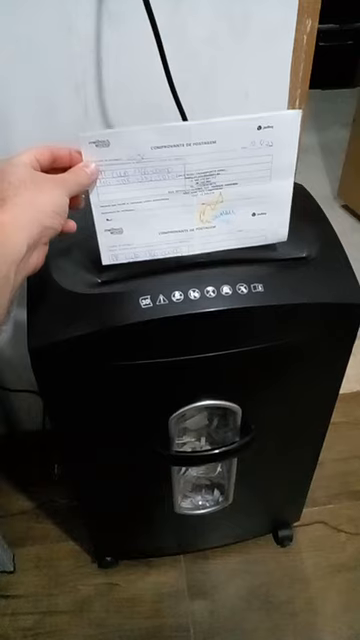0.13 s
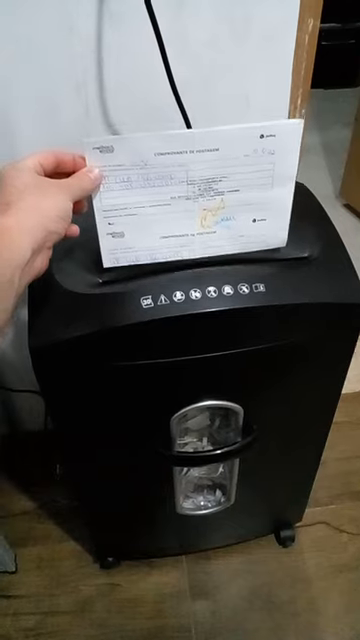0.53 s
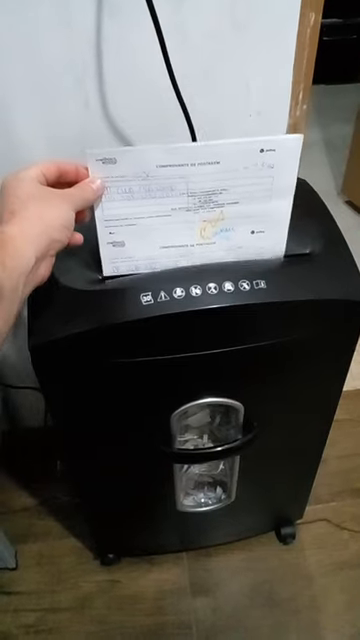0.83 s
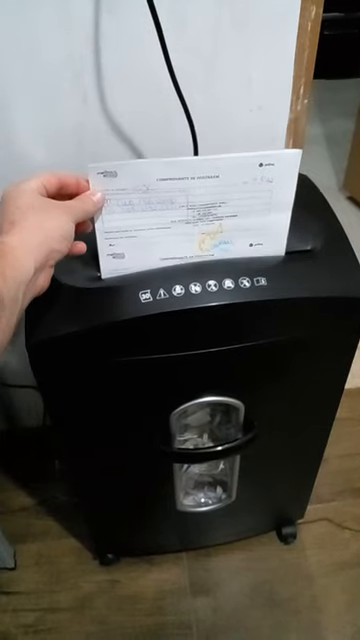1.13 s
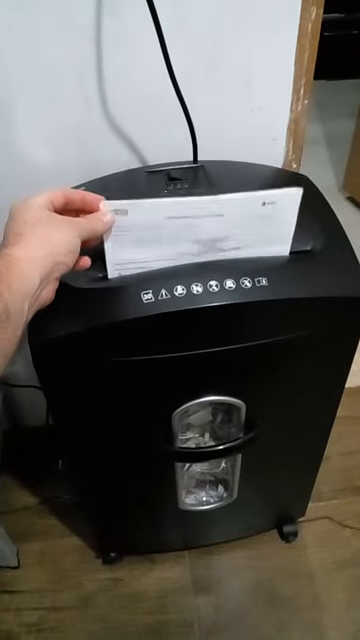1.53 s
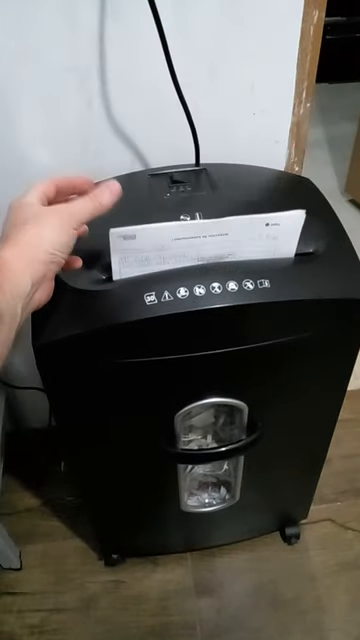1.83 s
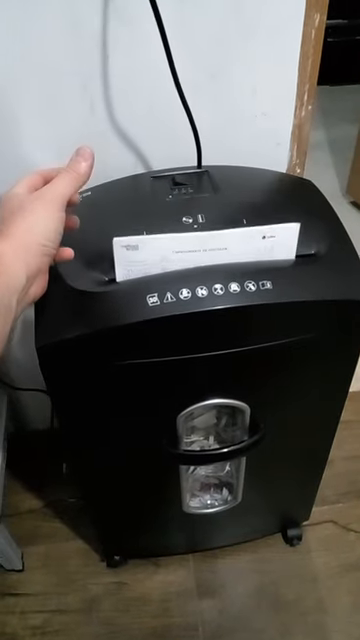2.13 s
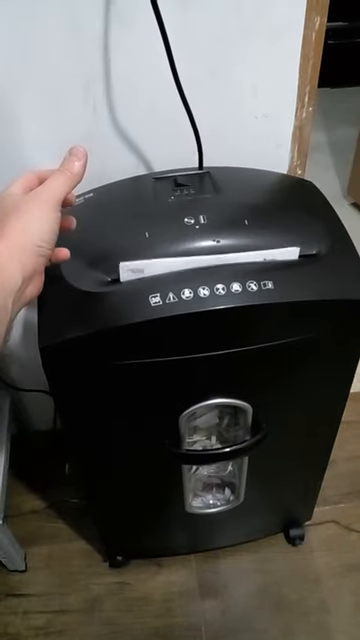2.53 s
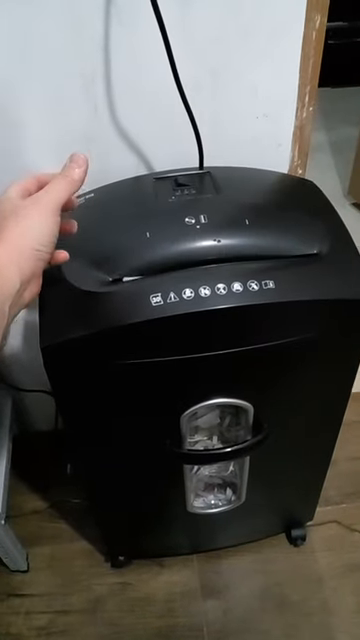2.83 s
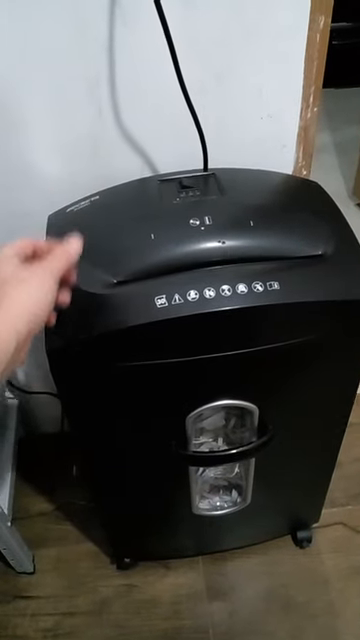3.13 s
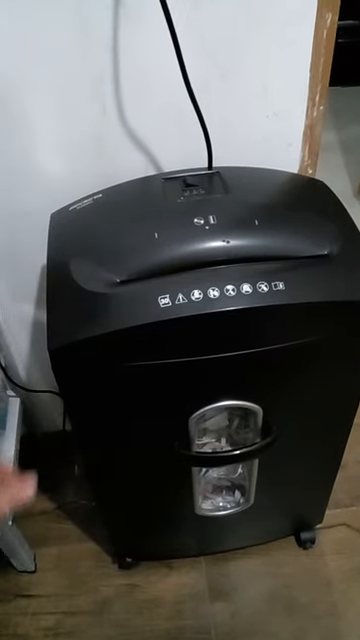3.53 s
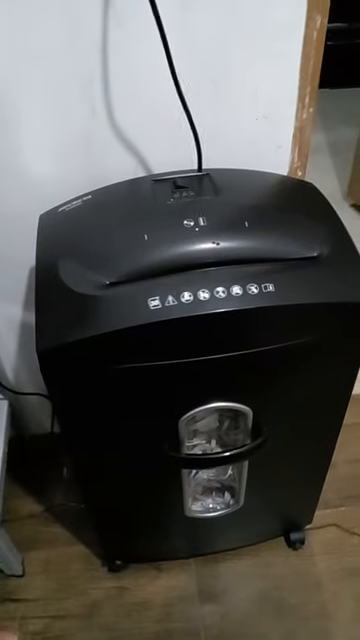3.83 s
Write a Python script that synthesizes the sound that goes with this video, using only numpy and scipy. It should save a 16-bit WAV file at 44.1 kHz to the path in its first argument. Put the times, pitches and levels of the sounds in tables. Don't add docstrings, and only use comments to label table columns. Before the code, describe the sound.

After over a second of near quiet, a paper shredder clicks on, surges to speed and keeps grinding with buzzing casing and gear whine while paper tears crisply; close microphone, short indoor echo.

```python
import sys
import numpy as np
from scipy import signal
from scipy.fft import rfft, irfft, next_fast_len
from scipy.io import wavfile
from scipy.ndimage import uniform_filter1d, map_coordinates

SR = 44100
rng = np.random.default_rng(int(sys.argv[2]) if len(sys.argv) > 2 else 0)


def materialize(psi):
    bounded = np.clip(np.atleast_2d(psi).T, -1, 1)
    quanta = np.round(bounded * 32767).astype(np.int16)
    wavfile.write(sys.argv[1], SR, quanta)


def volts_from_db(level):
    exponent = np.asarray(level, float) / 20
    return 10 ** exponent


N = 176400

# frequency in Hz, level in dB per Hz.
AIR_COLOUR = [(25, -21), (55, -9), (205, -6), (555, -5), (1500, -14), (2300, -20.5), (3200, -33),
              (5000, -40)]
# frequency in Hz, width in Hz, lift in dB.
AIR_RESONANCES = [(125.2, 7.2, 15), (192, 14, -6), (271, 17, 14), (303, 12, 6.5), (336, 14, 7.5),
                  (437, 24, 5.5), (512, 30, 3.5), (664, 18, 6), (4070, 540, 7)]
# frequency in Hz, level in dB.
WALL_COLOUR = [(100, -2), (3000, 1), (8000, -6), (15700, -6)]
# frequency in Hz, level in dB per Hz.
RELAY_COLOUR = [(120, -25), (200, -28), (577, 0), (1050, -1.5), (1340, -10.5), (2870, -7), (9420, -13),
                (15700, -21)]
# centre in seconds, half length in seconds, pitch in Hz, level
# in dB.
RINGING_SWELLS = [
    (1.517, 0.078, 1222, -44),
    (1.505, 0.043, 1392, -47),
    (1.504, 0.052, 590, -38),
    (1.74, 0.067, 452, -30),
    (2.56, 0.16, 327, -38.5),
    (2.48, 0.19, 200, -39),
    (3.1, 0.12, 327, -42),
    (3.45, .15, 180, -42),
    (4.2, 0.15, 1004, -49),
]
# time in seconds, level in dB.
PULL_LEVEL = [
    (1.43, -89),
    (1.47, -33.5),
    (1.53, -22),
    (1.67, -19.5),
    (1.93, -25.5),
    (2.71, -27),
    (2.75, -26),
    (3.97, -26),
    (4.0, -26.5),
]
# time in seconds, level in dB.
LOAD_LEVEL = [
    (1.43, -44.5),
    (1.5, -36.5),
    (1.57, -30),
    (1.7, -29),
    (1.78, -29.5),
    (2.0, -29),
    (3.0, -29.5),
    (4.0, -29),
]
# multiple of the turn rate, level in dB under the load, phase in radians.
WHINE_ORDERS = [(18, -16, 0), (20, -22, 1), (23, -16, 2.15), (24, -11.5, 1.23), (32, -22, .3), (52, -19, 0)]
# share of a turn, level in dB.
PROUD_TEETH = [(.025, -4), (.215, 0), (.322, 0), (.507, 0), (.62, 2.5), (.842, 1)]
# frequency in Hz, level in dB.
THUMP_COLOUR = [(150, -13), (300, -12.5), (480, 1), (700, -2.5), (1200, -18), (4000, -42)]
# frequency in Hz, level in dB.
TOOTH_COLOUR = [(300, -6), (520, -9), (800, 0), (1400, -1), (2200, 5.5), (2700, 3), (3100, 8), (9000, -5)]
# frequency in Hz, level in dB per Hz.
BODY_COLOUR = [(25, -45.5), (110, -17.5), (170, -12.5), (260, -6.5), (480, -7), (935, -20.5), (2950, -32),
               (8000, -46.5), (15700, -63.5)]
# frequency in Hz, width in Hz, lift in dB.
CASING_RESONANCES = [(67, 10, 9), (184, 10, 10), (204, 10, 7), (218, 14, -3), (260, 10, -3), (458, 36, 6),
                     (500, 44, 3.5), (533, 14, 5), (553, 14, -7), (578, 20, 4), (655, 16, 6), (700, 25, -5),
                     (737, 16, 5), (778, 16, 5), (850, 70, 4)]
# frequency in Hz, width in Hz, lift in dB.
SHAFT_RESONANCES = [(1004, 25, 6), (1145, 18, 5), (1222, 32, 8), (1341, 26, 10), (1392, 24, 9),
                    (1470, 60, -2), (2125, 30, 4), (2213, 27, 4), (2330, 160, 5), (2520, 150, -2),
                    (2720, 80, 4), (2970, 340, 7), (3520, 120, 3), (5890, 300, 6)]
# time in seconds, level in dB.
CUT_LEVEL = [(1.5, -54), (1.57, -63), (1.71, -52), (2.27, -48.5), (2.7, -50), (2.82, -48.5), (3.02, -52),
             (3.51, -52), (3.67, -57), (3.8, -53), (3.9, -61), (4.0, -63)]
# frequency in Hz, level in dB per Hz.
TEAR_COLOUR = [(1500, -23), (3500, 10), (6000, 6.5), (7500, -0.5), (10500, 1), (13000, 2.5), (15700, -1.5)]
# time in seconds, peak in dB.
FOLD_TICKS = [(1.5101, -38), (1.715, -35), (1.797, -37), (1.9456, -38), (2.019, -33), (2.104, -36),
              (2.16, -37), (2.204, -31), (2.2782, -34), (2.322, -32), (2.3417, -37), (2.5293, -36),
              (2.5586, -44), (2.615, -31.5), (2.7766, -35), (2.8105, -33.5), (2.9454, -36), (3.1074, -38),
              (3.2871, -37), (3.746, -43), (3.7894, -41), (3.8222, -38)]
# frequency in Hz, level in dB per Hz.
FOLD_COLOUR = [(1500, -18), (3500, 10.5), (6000, 3.5), (9000, 4), (12000, -3), (15700, -11)]
# time in seconds, peak in dB, pitch in Hz.
SHEET_SNAPS = [(1.512, -34, 3200), (1.5347, -40, 2580), (1.594, -31, 2680), (1.6225, -38, 2740),
               (1.6832, -29.5, 2760), (1.7761, -43, 2840), (1.7966, -35, 2740), (2.078, -33, 2800),
               (2.264, -29, 2940), (2.3174, -33, 2740), (2.5798, -38, 2700), (2.6157, -48, 2880),
               (2.6367, -40, 2880), (2.697, -39, 2860), (2.713, -34, 2770), (2.7499, -37, 2900),
               (2.8078, -46, 3160), (2.8392, -32.5, 2950), (2.861, -33, 3000), (2.9095, -39, 2720),
               (2.945, -35, 3150), (3.0248, -43, 2950), (3.146, -46, 2920), (3.167, -38, 2700),
               (3.2666, -44, 2900), (3.4468, -35, 2790), (3.4922, -39, 2640), (3.6109, -38, 2730),
               (3.639, -31, 2680), (3.7476, -35, 2720), (3.785, -36, 2710), (3.825, -34, 2760),
               (3.9676, -48, 2800)]
# frequency in Hz, level in dB.
SNAP_COLOUR = [(1200, 5), (2500, 9.5), (6000, 9), (9000, -29), (15000, -20)]

START_S = 1.4278
TURN_HZ = 10.242


def unit(x):
    return x / np.sqrt(np.mean(x ** 2) + 1e-20)


def clock():
    return np.arange(N) / SR


def running():
    return clock() > START_S


def noise():
    return rng.standard_normal(N)


def curve(rows):
    return np.interp(clock(), *np.transpose(rows))


def wobble(rate):
    knots = rng.standard_normal(int(N * rate / SR) + 4)
    return map_coordinates(knots, [clock() * rate])


def fade(start, t60):
    t = clock() - start
    return (t >= 0) * volts_from_db(-60 * np.abs(t) / t60)


def coloured(x, points, bumps=()):
    m = 2 * next_fast_len(N // 2 + 8192)
    hz = np.fft.rfftfreq(m, 1 / SR)
    f, level = np.transpose(points)
    db = np.interp(np.log(hz + 1), np.log(f + 1), level)
    for centre, width, lift in bumps:
        db = db + lift / (1 + (2 * (hz - centre) / width) ** 2)
    cepstrum = irfft(np.log(volts_from_db(db)), m)
    fold = np.r_[1, 2 * np.ones(m // 2 - 1), 1, np.zeros(m // 2 - 1)]
    response = np.exp(rfft(cepstrum * fold))
    return irfft(rfft(x, m) * response, m)[:N]


def patchy(x, depth_db):
    z = signal.stft(x, nperseg=256)[2]
    across = uniform_filter1d(rng.standard_normal(z.shape), 10, 0)
    field = uniform_filter1d(across, 30, 1)
    return signal.istft(z * volts_from_db(depth_db * unit(field)), nperseg=256)[1][:N]


def air():
    level_db = -64.5 + 3 * np.minimum(clock(), START_S) + .4 * wobble(8.4)
    rumble = unit(patchy(coloured(noise(), AIR_COLOUR, AIR_RESONANCES), 1.1))
    return volts_from_db(level_db) * rumble + volts_from_db(-85) * noise()


def room(x):
    t = np.arange(SR // 2) / SR
    t60 = 0.87
    tail = rng.standard_normal(len(t)) * volts_from_db(-60 * t / t60) * (t > .004)
    return coloured(signal.fftconvolve(x, tail / np.linalg.norm(tail))[:N], WALL_COLOUR)


def relay():
    burst = unit(coloured(noise(), RELAY_COLOUR))
    snap = volts_from_db(-36) * fade(START_S, .04)
    rattle = volts_from_db(-39.5 + 1.2 * wobble(90)) * fade(START_S, .39)
    return burst * (snap + rattle)


def buzzes():
    t = clock()
    out = np.zeros(N)
    for centre, half, hz, db in RINGING_SWELLS:
        swell = volts_from_db(db + 4 * wobble(50)) * np.exp(-((t - centre) / half) ** 2)
        out += swell * np.cos(2 * np.pi * hz * t + .0012 * hz * wobble(60))
    return out * running()


def hum():
    phase = 2 * np.pi * 120.03 * (clock() - 3)
    pull = volts_from_db(curve(PULL_LEVEL) + .4 * wobble(12)) * np.cos(phase + .6)
    octave = volts_from_db(curve(LOAD_LEVEL) - 8 + wobble(6.5)) * np.cos(2 * phase - 1.05)
    return np.sqrt(2) * (pull + octave) * running()


def wheel():
    spin_up_s, fast_hz, sag_hz_per_s = .05, .005, .022
    t = np.clip(clock() - START_S, 0, None)
    late = clock() - 3
    speed = (1 - np.exp(-t / spin_up_s)) * (1 + 1.5e-4 * wobble(9))
    steady = TURN_HZ * (START_S + spin_up_s + np.cumsum(speed) / SR)
    return fast_hz * late - sag_hz_per_s / 2 * late ** 2 + steady


def whine(turns):
    angle = 2 * np.pi * (turns - 3 * TURN_HZ)
    tones = np.zeros(N)
    for order, db, phase in WHINE_ORDERS:
        tones += volts_from_db(db + 2 * wobble(4)) * np.cos(order * angle + phase)
    return np.sqrt(2) * volts_from_db(curve(LOAD_LEVEL)) * tones * running()


def blows(turns, share, db, slack_s):
    at = np.flatnonzero(np.diff(np.floor(turns - share)))
    luck = rng.standard_normal((400, 2))[:len(at)]
    late = np.round(slack_s * SR * luck[:, 0]).astype(int)
    out = np.zeros(N)
    out[np.clip(at + late, 0, N - 1)] = volts_from_db(db + 1.5 * luck[:, 1])
    return out


def gears(turns):
    thumps = unit(sum(blows(turns, share, db, .00015) for share, db in PROUD_TEETH))
    thumps = coloured(thumps, THUMP_COLOUR)

    oval = np.cos(2 * np.pi * turns - 2.37)
    clicks = unit(blows(8 * turns, 0, 0, .000025))
    knocks = coloured(volts_from_db(-13 + 2 * oval) * clicks, TOOTH_COLOUR)

    flank = rng.standard_normal(round(SR / TURN_HZ))
    flaws = flank[(turns % 1 * len(flank)).astype(int)]
    grind = volts_from_db(0.38 * wobble(25.05)) * noise()
    tight_db = -1.1 * np.cos(6 * np.pi * turns + 0.22) + 0.65 * oval
    rub = volts_from_db(tight_db) * (volts_from_db(-10) * flaws + grind)

    drive = volts_from_db(-4) * thumps + knocks + rub
    ringing = unit(coloured(drive, BODY_COLOUR, CASING_RESONANCES + SHAFT_RESONANCES))
    return volts_from_db(curve(LOAD_LEVEL) + 0.93) * ringing * running()


def tearing():
    fibres_per_s, fibre_share = 800, .2
    hit = rng.random(N) < fibres_per_s / SR * volts_from_db(3 * wobble(40))
    strength = volts_from_db(3.5 * np.minimum(rng.exponential(size=N), 2))
    fibres = unit(hit * noise() * strength)
    hiss = volts_from_db(0.54 * wobble(17)) * noise()
    mix = np.sqrt(fibre_share) * fibres + np.sqrt(1 - fibre_share) * hiss
    return volts_from_db(curve(CUT_LEVEL) + 2) * unit(patchy(coloured(mix, TEAR_COLOUR), 1.5)) * running()


def folds():
    level = sum(volts_from_db(db - 5.5) * fade(start, .016) for start, db in FOLD_TICKS)
    return level * unit(coloured(noise(), FOLD_COLOUR))


def snaps():
    t = np.arange(SR // 20) / SR
    out = np.zeros(N + len(t))
    for start, db, hz in SHEET_SNAPS:
        rough = 1 + .6 * rng.standard_normal(len(t))
        ring = np.sin(2 * np.pi * hz * t) * rough * volts_from_db(-60 * t / .03)
        out[round(start * SR):][:len(t)] += volts_from_db(db - 11) * ring
    return coloured(out[:N], SNAP_COLOUR)


def paper():
    return tearing() + folds() + snaps()


def scene():
    turns = wheel()
    near = relay() + buzzes() + gears(turns) + paper()
    echo = volts_from_db(-7) * room(near)
    return (air() + echo + hum() + whine(turns) + near)[None]


def top_cut(x):
    return signal.sosfilt(signal.butter(12, 15730, fs=SR, output="sos"), x)


def record(dry):
    open_s, fade_s, top_hz = 0.067, .005, 15730
    opened = dry * np.clip((clock() - open_s) / fade_s, 0, 1)
    held = np.pad(opened, ((0, 0), (0, N)), "reflect")
    passed = rfft(held) * (np.fft.rfftfreq(2 * N, 1 / SR) < top_hz)
    mix = irfft(passed, 2 * N)[:, :N] * (clock() > open_s - .01)
    return top_cut(mix)


dry = scene()
out = record(dry)
materialize(out)
```